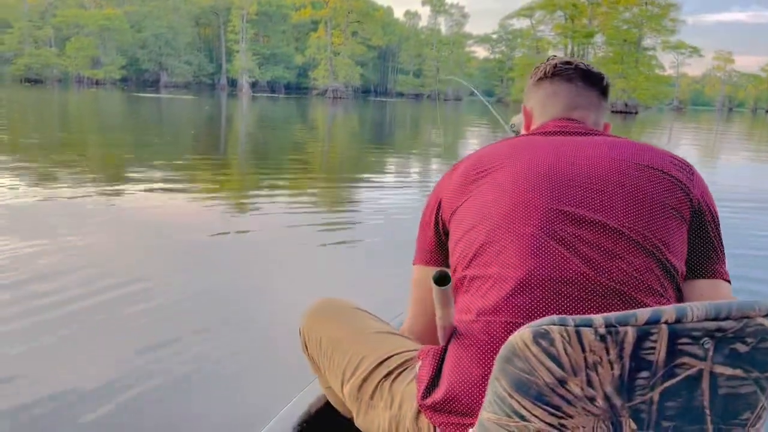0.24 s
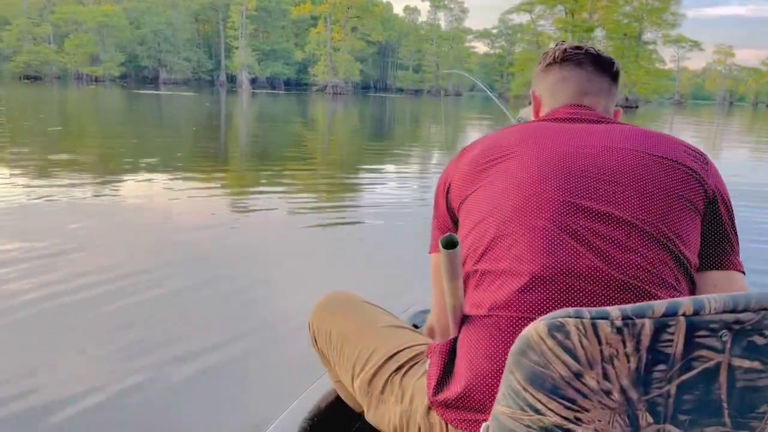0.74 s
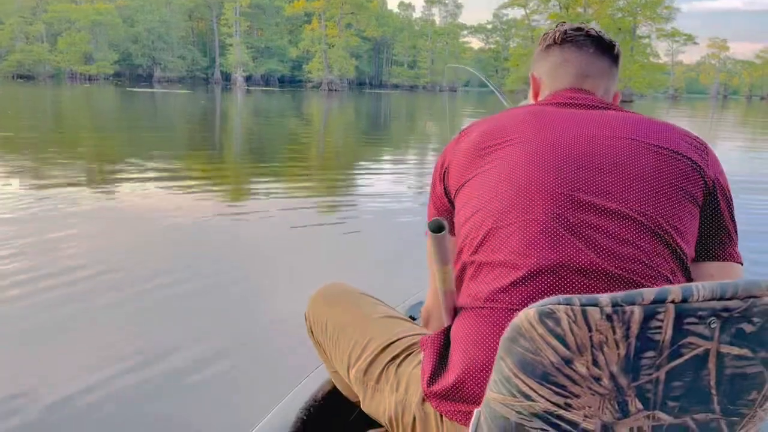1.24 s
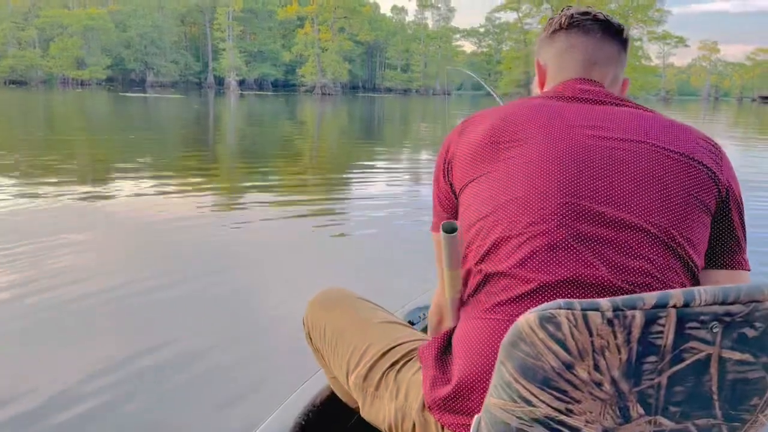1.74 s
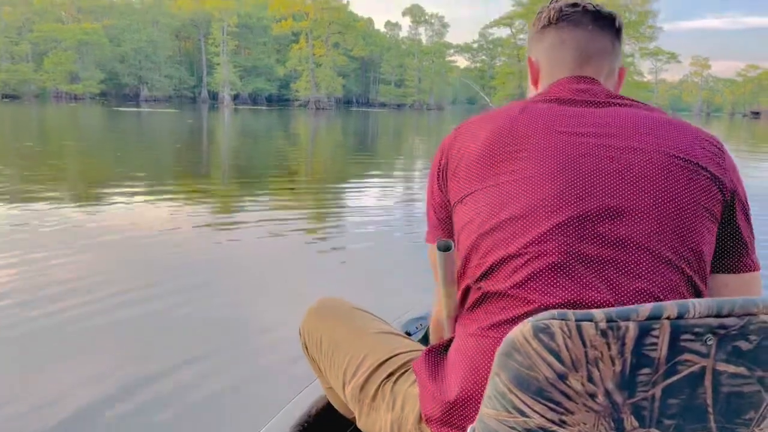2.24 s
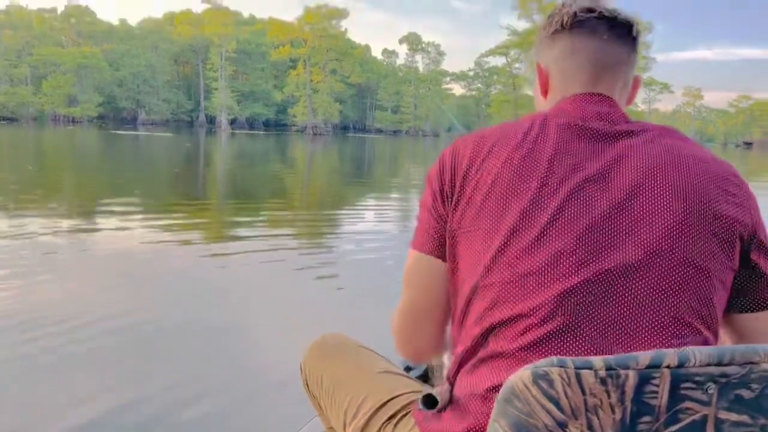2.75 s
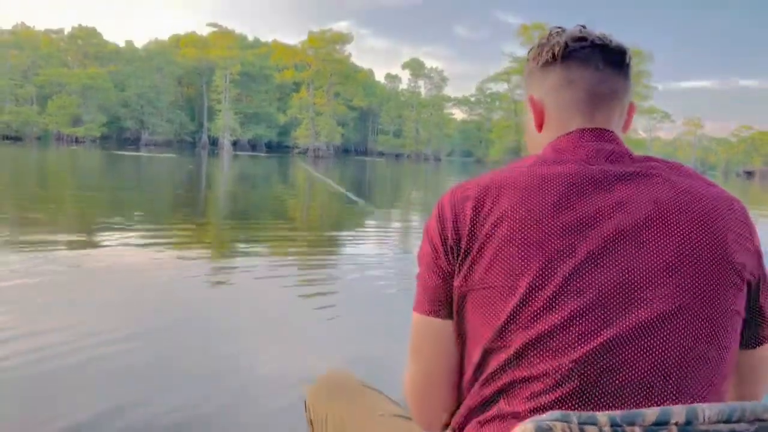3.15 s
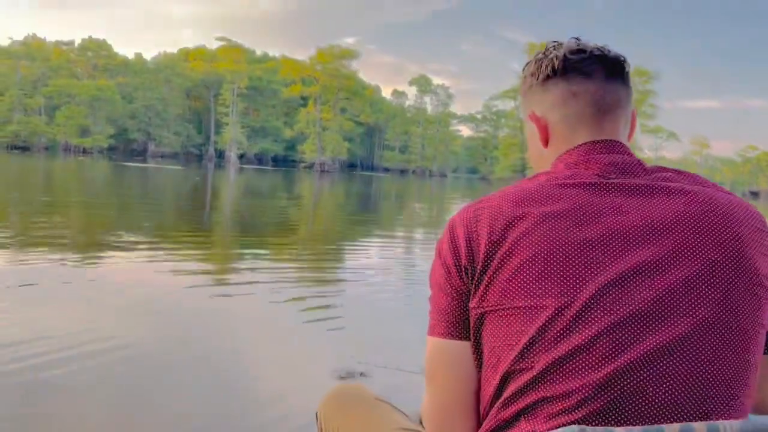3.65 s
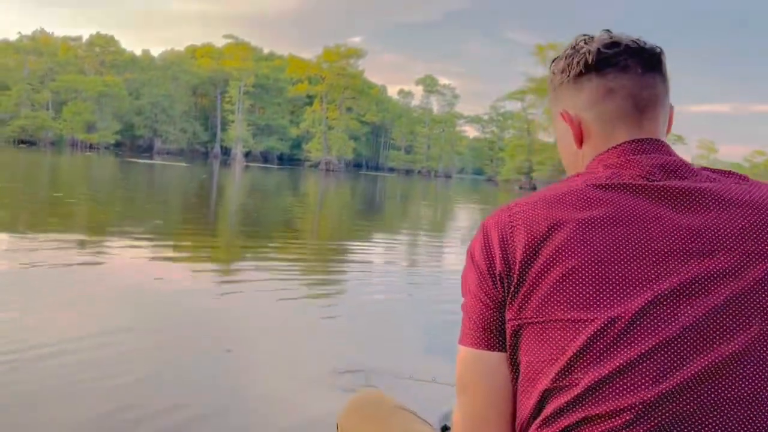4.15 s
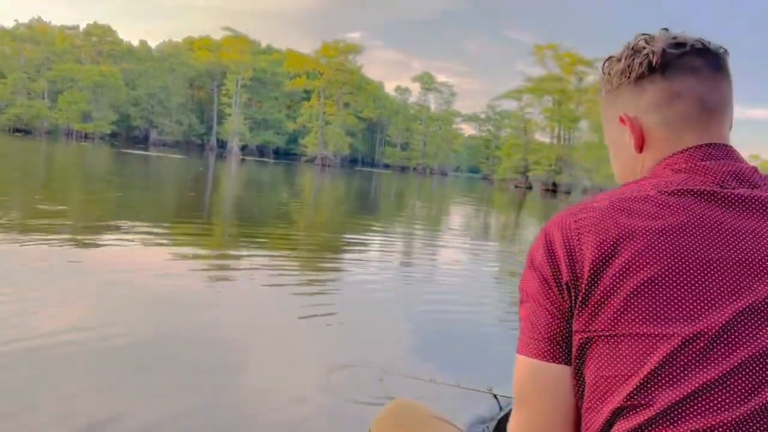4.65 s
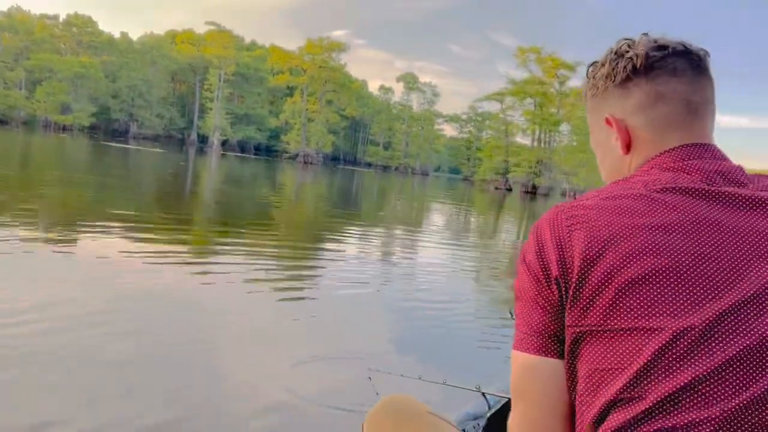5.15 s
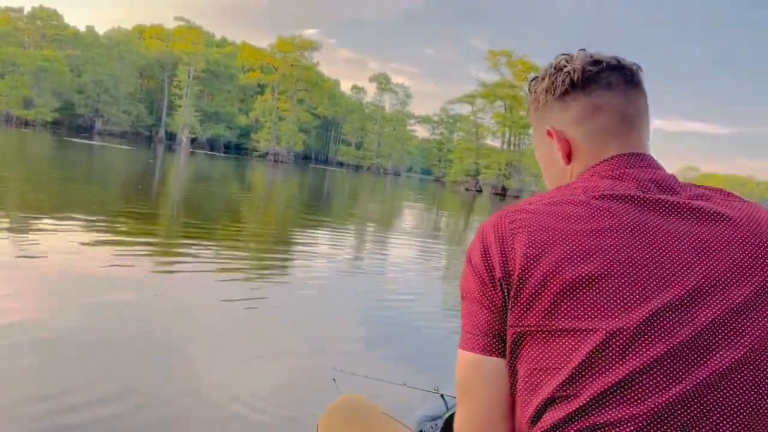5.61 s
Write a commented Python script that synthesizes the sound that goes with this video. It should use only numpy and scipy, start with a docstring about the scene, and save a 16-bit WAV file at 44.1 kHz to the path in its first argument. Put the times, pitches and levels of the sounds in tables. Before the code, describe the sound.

Electric motor hum on a calm lake, soft deck bumps and tackle clicks, a thin bird calling, then gear clattering sharply on a small boat's hull.

```python
"""On a calm lake an electric motor hums throughout as wavering sines, over broad background noise.
A small boat's deck bumps softly, an angler's tackle clicks in bursts of decaying modes, and the deck
bumps again. Small birds call thinly from the wooded shore in gliding, fluttering sines, and cast line
hisses. As the line stops, gear drops on the hull and bounces in a rattle of ringing hull modes.
Late on, a foot scuffs the deck in gritty noise, lighter knocks follow and a bird calls again."""
import sys
import numpy as np
from scipy import signal
from scipy.fft import rfft, irfft, next_fast_len
from scipy.io import wavfile
from scipy.ndimage import uniform_filter1d, map_coordinates

SR = 44100
rng = np.random.default_rng(int(sys.argv[2]) if len(sys.argv) > 2 else 0)


def wav_out(sig):
    """Save sig, one row per channel (or a flat mono array), as 16-bit PCM at SR to the path in sys.argv[1]."""
    wavfile.write(sys.argv[1], SR, np.round(np.clip(np.atleast_2d(sig).T, -1, 1) * 32767).astype(np.int16))


N = 259308

# colour of the broad background noise: freq_hz, density_db (per Hz)
BACKGROUND_COLOUR = [(20, -20.5), (55, 5), (100, 5.5), (150, 0), (260, -1), (450, -11.5), (760, -21.5),
                     (1020, -12), (1300, -29), (2100, -28), (2750, -22), (3500, -35), (4100, -30),
                     (4800, -40.5), (5600, -31.5), (7200, -41.5), (8800, -59.5), (9900, -46), (11400, -55),
                     (13000, -92.5)]
# width of every broad noise: freq_hz, side_over_mid_db
NOISE_WIDTH = [(60, -26.5), (120, -21.5), (360, -8.5), (660, -1), (1200, -7.5), (2200, -8.5), (4000, 0),
               (7300, -8), (13000, 16)]
# drifting main tone of the motor: time_s, pitch_hz, level_db
MOTOR_TONE = [(0, 107.8, -51), (1.3, 105.4, -52), (2.8, 115.5, -54.5), (5.7, 117.1, -57)]
# steady-pitched lines of the motor: pitch_hz, start_level_db, level_slope_db_per_s
MOTOR_LINES = [(185.2, -55.5, -0.9), (278, -63, 1), (372, -68, 0)]
# decay of the tail from the trees: freq_hz, t60_s
SHORE_DECAY = [(200, 0.33), (2000, 0.14), (6000, 0.72), (12000, 0.36)]
# nearly flat colour of that tail: freq_hz, density_db
SHORE_COLOUR = [(100, 0.0014), (12000, 0.023)]
# quick echoes off water and trunks: freq_hz, density_db; then freq_hz, t60_s
ECHO_COLOUR = [(1000, 0), (12000, 0)]
ECHO_DECAY = [(1000, .12), (12000, .12)]
# a small bird's short peaked chips: start_s, length_s, top_hz, level_db
BIRD_CHIPS = [(1.915, .016, 5100, -69), (1.94, 0.018, 5190, -62), (2.319, 0.028, 5320, -59),
              (2.424, 0.03, 5140, -62), (2.543, 0.039, 5270, -60), (2.684, 0.037, 5440, -59),
              (4.913, 0.018, 5220, -65), (5.06, .022, 5060, -72), (5.096, 0.02, 5280, -66),
              (5.153, .025, 5510, -68), (5.236, 0.0313, 5330, -59.5), (5.396, 0.026, 5280, -60.5),
              (5.522, 0.025, 5330, -60), (5.627, 0.014, 5180, -65), (5.656, 0.018, 5190, -64.5)]
# its buzzy slurs: start_s, length_s, from_hz, to_hz, level_db
BIRD_BUZZES = [(2.016, 0.057, 5040, 5750, -64.5), (2.096, 0.097, 6070, 4720, -58.5),
               (2.751, 0.053, 4964, 5070, -65), (2.83, .04, 5035, 5310, -62.5),
               (2.851, 0.13, 5634, 5900, -54), (5.73, 0.064, 4960, 5080, -67.5),
               (5.829, 0.053, 5550, 5820, -53.5)]
# its clear whistles: start_s, length_s, from_hz, to_hz, upward_bow_hz, level_db
BIRD_WHISTLES = [(2.049, .018, 5800, 5700, 403, -59), (2.892, .11, 5950, 5390, 254, -44),
                 (2.99, 0.025, 5750, 4750, 149, -59), (3.163, 0.029, 6730, 4880, 122.5, -50),
                 (3.192, 0.041, 4700, 4950, -400, -60), (3.234, .035, 4800, 4700, 56, -63.5),
                 (3.306, 0.064, 5450, 5510, 271, -40.5), (5.773, 0.02, 5400, 5590, 647.5, -55.5)]
# a second bird's low falling peeps: start_s, from_hz, level_db
BIRD_PEEPS = [(2.18, 2350, -69), (2.344, 2440, -60), (2.36, 3200, -70), (2.419, 3400, -69),
              (2.482, 2470, -55.5), (2.53, 3550, -66), (2.56, 2550, -67)]
# the deck flexing under shifting weight: peak_s, pitch_hz, level_db
DECK_BUMPS = [(.06, 150, -44), (.11, 115, -45.5), (1.5, 170, -36), (1.546, 138, -41), (1.583, 98, -38),
              (1.685, 126, -29.5), (1.718, 95, -32.5), (1.75, 74.5, -32), (1.793, 250, -40),
              (4.668, 159, -45), (4.744, 269, -44), (4.767, 265, -41.5), (4.798, 202, -45.5)]
# colour of a sole rubbing the deck: freq_hz, density_db
SCUFF_COLOUR = [(90, -10.0), (170, -21.0), (250, 4.5), (330, 1), (420, -3.5), (600, -1.0),
                (1000, -16.5), (1600, -15.5), (4000, -70.0)]
# ring of each grit slip: freq_hz, density_db; then freq_hz, t60_s
GRIT_COLOUR = [(300, -20), (600, 0), (1500, -4), (3000, -12), (6000, -26)]
GRIT_DECAY = [(500, .05), (4000, .02)]
# colour of line leaving the spool: freq_hz, density_db
LINE_COLOUR = [(1500, -25), (2300, -3), (2900, 0), (3400, -3), (4000, -16), (4900, -24),
               (6200, -13), (11000, -27), (13000, -60)]
# hand shifting its grip, a grainy rustle of the reel: middle_s, half_length_s, level_db
GRIP_RUSTLES = [(0.527, 0.063, -67.5), (1.13, 0.028, -74.5), (1.607, 0.022, -50.5), (1.667, 0.006, -50),
                (1.695, 0.0093, -42.5), (2.14, 0.044, -72.5), (2.387, 0.047, -70), (3.373, 0.024, -72),
                (3.463, 0.016, -52.5), (4.635, .015, -67)]
# ring of a loose reel part: freq_hz, density_db; then freq_hz, t60_s
CHATTER_COLOUR = [(900, -14.5), (2000, -1), (3000, -1), (4200, 0.5), (4900, -7), (5900, 6), (7000, 4.5),
                  (7900, -1.5), (9000, -13.5), (10000, 8.5), (11400, 0.5), (12400, -15), (14500, -24)]
CHATTER_DECAY = [(1000, .05), (6000, .03), (11000, .025)]
# metal parts of the reel snapping: start_s, tick_db, brightness_db, ring_hz, ring_db
REEL_SNAPS = [(0.446, -57, 13, 3040, -53), (0.478, -59, 13, 3100, -46), (0.514, -59.5, 3, 6330, -50),
              (0.533, -56.5, -3, 845, -43), (0.621, -58, 9, 6880, -47.5), (0.654, -68, 5, 6860, -59),
              (0.705, -61.5, 12, 3300, -55), (1.541, -62.5, 14, 6880, -52),
              (1.5696, -49.5, 13, 11000, -36.5), (1.648, -48, 9, 6300, -44),
              (1.6839, -44, 2.5, 3350, -37.5), (1.694, -61, 21, 5930, -42), (1.721, -54.5, 6, 5860, -43),
              (1.7845, -46.5, 2, 2540, -39), (1.805, -57.5, 0, 5750, -51), (2.308, -52.5, 3.5, 2900, -41.5),
              (2.673, -63, 5, 2940, -55), (2.927, -49, 3, 6060, -56), (3.293, -51, 3.5, 2250, -44),
              (3.356, -34, 3, 3810, -27), (3.723, -42, -0.5, 2870, -35), (3.741, -74.5, 3, 4060, -63),
              (4.209, -63, -3.5, 6340, -60)]
# duller taps of the rod and its handle: start_s, clack_db, brightness_db, ring_hz, ring_db
ROD_TAPS = [(1.481, -51, -19, 1180, -47), (1.535, -59, -12, 1250, -50), (1.654, -29, -11, 1755, -16),
            (1.986, -64.5, -4, 3260, -57), (2.23, -61, -3.5, 1910, -71), (2.331, -55, -4, 2900, -51),
            (2.454, -57, -27, 1640, -53), (2.958, -48, 5, 1860, -36), (3.234, -69, 8, 2900, -64),
            (3.255, -63.5, 4, 2590, -53), (3.34, -53, 3, 2700, -41), (3.379, -46.5, -5, 2715, -52),
            (3.4185, -36, -2, 2134, -9.5), (3.93, -54.5, -6.5, 2920, -53), (4.362, -71, 3, 3620, -69),
            (4.022, -56.5, -12, 1390, -53), (4.611, -47.5, -1, 3940, -36.5), (4.647, -49, -10.5, 2540, -42),
            (4.63, -59, -6, 2100, -55), (4.869, -53.5, -6, 2990, -44.5), (4.885, -53.5, -10, 620, -43),
            (5.17, -57, 5.5, 3960, -59), (5.214, -62.5, -9, 1300, -46.5)]
# strong modes of the tackle, before random detuning and scatter: pitch_hz, level_db, t60_s
TACKLE_MODES = [(590, -15, .07), (840, -10, .08), (1130, -7, .06), (1430, -1, .05), (1860, 0, .043),
                (2370, -9, .04), (3200, -6, .035), (3820, -5, .03), (5900, -7, .035), (6900, -6, .03)]
# dense tackle modes between those: freq_hz, density_db; then freq_hz, t60_s
TACKLE_WASH_COLOUR = [(150, -19), (500, 2.5), (1500, 0), (3200, 1), (4200, 1), (4900, -2.5), (6200, 1),
                      (7800, -5.5), (9000, -36.5), (10800, -28.5), (12200, -40), (14500, -35.5)]
TACKLE_WASH_DECAY = [(500, 0.13), (2000, 0.13), (6000, 0.051), (11000, 0.05)]
# gear landing on the hull: start_s, knock_db, thud_db, crack_db
HULL_KNOCKS = [(1.4797, -58, -41, -65), (1.532, -64, -47.5, -71), (3.417, -22, -22.5, -26),
               (3.474, -31, -32.5, -35), (3.6152, -28.5, -30.5, -34), (3.6486, -29.5, -34.5, -37),
               (3.669, -42, -36, -40.5), (3.701, -47, -45, -74), (3.774, -35, -38, -40.5),
               (3.801, -43, -40.5, -58), (3.825, -47, -45.5, -59), (3.8613, -42, -44, -54),
               (3.888, -49.5, -44.5, -70.5), (3.936, -52, -55.5, -78), (4.019, -59, -54, -73),
               (4.645, -50, -48, -62), (4.676, -57.5, -48.5, -67), (4.884, -54, -48.5, -70),
               (4.903, -60, -56, -80)]
# strong hull modes, before the force of a contact tilts and damps them: pitch_hz, level_db, t60_s
HULL_MODES = [(102, -6, .3), (136, -5, .28), (170, -11, .16), (210, -4, .22), (242.5, -.5, .28),
              (285, -11, .18), (317, -.5, .2), (372, -9, .15), (486, -3, .14), (522, -7, .12),
              (559, -4, .11), (592, -6, .09), (636, -4, .1), (755, -7, .08), (788, -10, .08),
              (912, -14, .09), (1175, -9, .06), (1215, -4, .08), (1455, 2, .1), (1551, 3.5, .1),
              (1595, 1, .09), (1850, -8, .05), (2035, -6, .05), (2140, -5, .05), (2365, -9, .06),
              (2680, -11, .05), (2880, -3, .04), (3030, -5, .04), (3160, -8, .04), (3600, -9, .04),
              (4230, -6, .035)]
# dense hull modes between those: freq_hz, density_db; then freq_hz, t60_s
HULL_WASH_COLOUR = [(50, -9), (110, -13), (160, -18), (230, -11), (350, -7.5), (560, -10), (780, -14),
                    (1020, -26), (1200, -15.5), (1320, -26.5), (1550, -16), (1750, -19.5), (2100, -17.5),
                    (2600, -22), (2900, -17), (3350, -23.5), (4200, -20.5), (4900, -33), (6000, -21.5),
                    (7800, -23), (9000, -39), (10900, -19.5), (13500, -31)]
HULL_WASH_DECAY = [(100, 0.24), (300, 0.23), (700, 0.1043), (1800, 0.055), (5000, 0.045), (11000, 0.028)]
# width of the close sounds: freq_hz, side_over_mid_db
BOAT_WIDTH = [(110, -32), (200, -18), (400, -9), (520, -8.5), (700, 2), (850, -9.5), (1300, -4.5),
              (1500, -14), (1700, -10.5), (2100, -13), (2600, 1), (2900, -4.5), (3300, 1.5), (3900, -10),
              (4800, 8), (5800, -12.5), (7200, -5), (9000, 23), (11000, -4), (12500, -13.5)]
# phase lead of side over mid in the close sounds: freq_hz, phase_rad
BOAT_PHASE = [(200, 4.3), (620, 4.2), (1150, 2.8), (2000, 2.2), (3000, 1.7), (4400, 1.5), (5400, 4.5),
              (6800, 1.8), (8600, 1.5), (9600, 4.5)]

# registers of a hull knock, then of a tackle click: low_hz, high_hz
THUD, BODY, RING, CRACK = (70, 380), (380, 1020), (1020, 2600), (2600, 15000)
CLACK, TICK, SHEEN = (400, 2400), (2700, 8300), (9700, 13000)


def amp(db):
    """Decibels to gain."""
    return 10 ** (np.asarray(db) / 20)


def unit(x):
    """x at rms 1."""
    return x / np.sqrt(np.mean(x ** 2) + 1e-20)


def along(points, hz):
    """Read (Hz, value) points on a log frequency axis."""
    f, v = np.transpose(points)
    return np.interp(np.log(hz + 1), np.log(f + 1), v)


def curves(rows):
    """One value per sample for each column after the time."""
    s, *cols = np.transpose(rows)
    return [np.interp(np.arange(N) / SR, s, c) for c in cols]


def wobble(rate):
    """A smooth random curve, rate knots a second."""
    knots = rng.standard_normal(int(N * rate / SR) + 4)
    return map_coordinates(knots, [np.arange(N) * rate / SR])


def swell(s, rise, fall):
    """A gain that rises to 1 at time s and falls again, both in dB a second."""
    t = np.arange(N) / SR - s
    return amp(np.minimum(abs(rise) * t, -abs(fall) * t))


def filtered(x, response):
    """x shaped by a complex response of frequency."""
    n = x.shape[-1]
    m = next_fast_len(n + 4096)
    return irfft(rfft(x, m) * response(np.fft.rfftfreq(m, 1 / SR)), m)[..., :n]


def add(track, s, sound):
    """Mix a sound into the track at time s."""
    part = track[..., round(s * SR):][..., :sound.shape[-1]]
    part += sound[..., :part.shape[-1]]


def dying_noise(colour, decay, size):
    """Two coloured noises whose every frequency dies at its own speed."""
    noise = filtered(rng.standard_normal((2, size)), lambda hz: amp(along(colour, hz)))
    hz, t, z = signal.stft(noise, SR, nperseg=128)
    fading = z * amp(-60 * t / along(decay, hz)[:, None])
    return signal.istft(fading, SR, nperseg=128)[1][:, :size]


def rush(colour, patchy_db):
    """Wide noise, as mid and side, with patches of random gain in time and frequency."""
    z = signal.stft(rng.standard_normal((2, N)), nperseg=512)[2]
    field = uniform_filter1d(rng.standard_normal(z.shape[1:]), size=6, axis=0)
    field = uniform_filter1d(field, size=14, axis=1)
    pair = signal.istft(z * amp(patchy_db * unit(field)), nperseg=512)[1][:, :N]
    mid, side = filtered(pair, lambda hz: amp(along(colour, hz)))
    side = filtered(side, lambda hz: amp(along(NOISE_WIDTH, hz)))
    return np.array([mid, side]) / mid.std()


def background_noise():
    """Broad background noise: low rumble, and a faint treble hiss of random, wavering level."""
    noise = rush(BACKGROUND_COLOUR, patchy_db=1.5)
    rumble = filtered(noise, lambda hz: 1 / (1 + (hz / 400) ** 4))
    hiss = filtered(noise, lambda hz: 1 - 1 / (1 + (hz / 7500) ** 8))
    middle = noise - rumble - hiss
    return amp(-54) * (amp(0.94 * wobble(3)) * rumble + middle + amp(3.5 * wobble(10)) * hiss)


def motor():
    """An electric motor hums: one drifting tone and a few steady, slightly wavering lines."""
    t = np.arange(N) / SR
    hz, db = curves(MOTOR_TONE)
    level = amp(db + 1.27 * wobble(9))
    hum = level * np.sin(2 * np.pi * np.cumsum(hz + 2 * wobble(2.9)) / SR)
    for line_hz, line_db, db_per_s in MOTOR_LINES:
        phase = 2 * np.pi * line_hz * t + .4 * wobble(7)
        hum = hum + amp(line_db + db_per_s * t + 1.3 * wobble(3.5)) * np.sin(phase)
    return np.array([hum, np.zeros(N)])  # mid only


def shore(x):
    """The trees scatter back a faint diffuse tail: the mid convolved with decaying noise."""
    tail = dying_noise(SHORE_COLOUR, SHORE_DECAY, size=SR)
    return signal.fftconvolve(x[:1], tail / np.linalg.norm(tail[0]), axes=1)[:, :N]


def over_water(song):
    """Water and nearby trunks add quick weak echoes that blur each bird note."""
    echoes = dying_noise(ECHO_COLOUR, ECHO_DECAY, size=SR // 8)
    blur = signal.fftconvolve(song[:1], echoes / np.linalg.norm(echoes[0]), axes=1)[:, :N]
    return song + amp(-13) * blur


def note(length, from_hz, to_hz, bow_hz, buzz, pointed=1):
    """A thin bowed glide, a little unsteady; fast flutter of pitch and level makes it buzz."""
    t = np.arange(int(length * SR)) / SR
    u = t / length
    drift = map_coordinates(rng.standard_normal(64), [130 * t])  # 130 knots a second
    flutter = buzz * np.sin(2 * np.pi * 184 * t + 0.22 * drift)  # 184 Hz
    glide = from_hz + (to_hz - from_hz) * u + bow_hz * (4 * u * (1 - u)) ** pointed
    phase = 2 * np.pi * np.cumsum(glide * (1 + .009 * drift) + 300 * flutter) / SR
    level = amp(5.7 * flutter + 2.2 * drift) * np.sin(np.pi * u) ** .7
    return level * np.array([np.sin(phase), 0.19 * np.cos(phase)])


def bird():
    """One bird chips, buzzes and whistles in gliding sines; two others call lower and fainter."""
    chip_foot_hz = 5140  # where a chip starts and ends
    peep_s, peep_fall_hz = 0.051, 149
    out = np.zeros((2, N))
    for s, length, top_hz, db in BIRD_CHIPS:
        rise_hz = top_hz - chip_foot_hz
        chip = note(length, chip_foot_hz, chip_foot_hz, rise_hz, buzz=0.22, pointed=1.9)
        add(out, s, amp(db) * chip)
    for s, length, from_hz, to_hz, db in BIRD_BUZZES:
        add(out, s, amp(db) * note(length, from_hz, to_hz, bow_hz=168, buzz=0.97))
    for s, length, from_hz, to_hz, bow_hz, db in BIRD_WHISTLES:
        add(out, s, amp(db) * note(length, from_hz, to_hz, bow_hz, buzz=.1))
    for s, hz, db in BIRD_PEEPS:
        add(out, s, amp(db) * note(peep_s, hz, hz - peep_fall_hz, bow_hz=0, buzz=0.35))
    far_call = note(0.17, 1790, 1790, bow_hz=0, buzz=0)  # one level note from far away
    add(out, 5.762, amp(-69) * far_call)
    return out


def bump(hz):
    """One soft flex of the deck: a swell of a few cycles and its octave."""
    cycles = hz * (np.arange(SR // 5) / SR - .1)  # counted from the peak, 0.1 s in
    phase = 2 * np.pi * (cycles + rng.random((2, 1)))
    envelope = np.exp(-(cycles / 0.96) ** 2 / 2)
    return envelope * (np.sin(phase[0]) + amp(-9.5) * np.sin(2 * phase[1]))


def deck():
    """Shifting weight flexes the deck in soft bumps, and a foot scuffs across it as gritty noise."""
    rub = amp(-54 + 3 * wobble(45))  # the sole sticks and slips
    rub = rub * swell(4.66, rise=48.5, fall=32)
    out = rub * rush(SCUFF_COLOUR, patchy_db=3.0)
    grit_per_s = 120
    slips = (rng.random(N) < grit_per_s / SR) * rng.standard_normal(N)
    ring = dying_noise(GRIT_COLOUR, GRIT_DECAY, size=SR // 10)
    crackle = unit(signal.fftconvolve(slips[None], ring, axes=1)[:, :N])  # grit under the sole
    out = out + amp(-12) * rub * crackle * [[1], [.5]]
    for s, hz, db in DECK_BUMPS:
        add(out[0], s - .1, amp(db) * bump(hz))
    return out


def line():
    """Line hisses off the spool during the cast, fluttering as the coils leave."""
    full_speed_s, stop_s, release_s = 2.58, 3.42, 0.14
    hiss = rush(LINE_COLOUR, patchy_db=2)
    flutter = amp(1.8 * wobble(70))
    running = np.clip((stop_s - np.arange(N) / SR) / release_s, 0, 1)
    return amp(-69) * swell(full_speed_s, rise=60, fall=0) * running * flutter * hiss


def strike(modes, wash, decay, wash_db, attack, scatter_db, detune):
    """One blow, heard two ways: the strong modes at new strengths over a wash of dense ones."""
    t = np.arange(SR // 3) / SR
    hz, db, t60 = np.transpose(modes)[:, :, None]
    hz = hz * (1 + detune * rng.standard_normal(hz.shape))
    size = amp(db + scatter_db * rng.standard_normal(hz.shape) - 60 * t / t60)
    size = size * (1 - np.exp(-t * hz / 0.098))  # builds up over about a tenth of a cycle
    phase = 2 * np.pi * (hz * t + rng.random((2, len(hz), 1)))
    ring = (size * np.sin(phase)).sum(1)
    dense = amp(wash_db) * unit(dying_noise(wash, decay, len(t)))
    return (unit(ring) + dense) * (1 - np.exp(-(t / attack) ** 2))


def register(blow, edges):
    """One register of a blow (edges in Hz), its mid at rms 1 over its loudest 10 ms."""
    part = signal.sosfilt(signal.butter(4, edges, "band", fs=SR, output="sos"), blow)
    return part / np.sqrt(uniform_filter1d(part[0] ** 2, size=SR // 100).max())


def reel():
    """Loose reel parts tick unevenly: faintly all along, more near snaps, knocks and grip shifts."""
    ticks_per_s, spread = 800, .7
    jolts = [(s, db - 17) for s, db, *_ in REEL_SNAPS]
    jolts += [(s, db - 38) for s, db, *_ in HULL_KNOCKS]
    shaking = np.max([amp(db) * swell(s, rise=316.5, fall=183.5) for s, db in jolts], axis=0)
    shaking = np.minimum(shaking, amp(-57.0))  # the parts have only so much play
    t = np.arange(N) / SR
    for s, half, db in GRIP_RUSTLES:
        shaking = shaking + amp(db) * np.exp(-((t - s) / half) ** 2)
    chatter = np.zeros((2, N))
    for part in range(4):  # each loose part has its own ring
        ticks = (rng.random(N) < ticks_per_s / 4 / SR) * np.exp(spread * rng.uniform(-1.1, 2, N))
        ring = dying_noise(CHATTER_COLOUR, CHATTER_DECAY, size=SR // 10)
        chatter = chatter + signal.fftconvolve(ticks[None], ring, axes=1)[:, :N]
    idle = amp(-80 + 2.3 * wobble(7))
    return (shaking + idle) * unit(chatter)


def click(clack_db, tick_db, sheen_db):
    """One contact in the tackle, in three registers: clack, tick and sheen."""
    blow = strike(TACKLE_MODES, TACKLE_WASH_COLOUR, TACKLE_WASH_DECAY,
                  wash_db=-2, attack=.0009, scatter_db=3, detune=.035)
    out = amp(clack_db) * register(blow, CLACK)
    out = out + amp(tick_db) * register(blow, TICK)
    return out + amp(sheen_db) * register(blow, SHEEN)


def ping(hz, t60):
    """The struck part rings briefly at its own pitch, as a decaying sine."""
    t = np.arange(SR // 10) / SR
    envelope = amp(-60 * t / t60) * (1 - np.exp(-t * hz))
    return envelope * np.sin(2 * np.pi * (hz * t + rng.random((2, 1))))


def tackle():
    """The reel's metal parts snap brightly; the rod taps with a duller clack; each contact rings."""
    out = np.zeros((2, N))
    for s, db, bright_db, hz, ring_db in REEL_SNAPS:
        sheen_db = db - 1.5 + 0.52 * bright_db  # a brighter snap has more top treble
        add(out, s, click(db - bright_db, db, sheen_db))
        add(out, s + .001, amp(ring_db) * ping(hz, t60=0.052))
    for s, db, bright_db, hz, ring_db in ROD_TAPS:
        add(out, s, click(db, db + bright_db, db + bright_db - 17.5))
        add(out, s + .001, amp(ring_db) * ping(hz, t60=0.028))
    return out


def knock(knock_db, thud_db, crack_db):
    """One hull contact: the harder, the brighter and shorter; slow bending waves delay the thud."""
    over_hard_db = knock_db + 25.5  # a hard knock is -25.5 dB
    force = min(amp(over_hard_db), 1)
    tilt = np.clip(0.41 * over_hard_db, -4, 5)  # dB per octave above 1500 Hz
    modes = []
    for hz, db, t60 in HULL_MODES:
        damping = 1 + .75 * np.sqrt(force) * (hz > BODY[0])  # contact shortens the upper modes
        modes.append((hz, db + tilt * np.log2(max(hz, 1500) / 1500), t60 / damping))
    blow = strike(modes, HULL_WASH_COLOUR, HULL_WASH_DECAY,
                  wash_db=-5.5, attack=.003, scatter_db=2.3, detune=.002)
    out = amp((knock_db + thud_db) / 2) * register(blow, BODY)
    out = out + amp(knock_db) * register(blow, RING)
    out = out + amp(crack_db) * register(blow, CRACK)
    t = np.arange(out.shape[1]) / SR
    punch_db = 4.5 * np.sqrt(force) * np.exp(-((t - 0.0027) / 0.0024) ** 2)  # direct push at the start
    out = out * amp(punch_db)
    add(out, .004, amp(thud_db) * register(blow, THUD))
    return out


def hull():
    """Gear rattles on the hull; in a firm blow its other end slaps down just after, and it jiggles."""
    out = np.zeros((2, N))
    for s, knock_db, thud_db, crack_db in HULL_KNOCKS:
        add(out, s - .001, knock(knock_db, thud_db, crack_db))
        if knock_db > -36:  # a firm blow
            softer = (min(knock_db, -28), thud_db - 7.5, crack_db - 8.5)
            add(out, s + .0095, amp(-13) * knock(*softer))  # the other end
            for delay in rng.uniform(.015, .06, size=3):  # small stray contacts, weaker with time
                add(out, s + delay, amp(-15.5 - 130 * delay) * knock(*softer))
    return out


def near(pair, alike):
    """Close sounds reach the two ports shifted in phase and partly unrelated: mid and side."""
    share = np.clip(alike, 0, 1)

    def related(hz):
        return share * np.exp(1j * along(BOAT_PHASE, hz)) * amp(along(BOAT_WIDTH, hz))

    def unrelated(hz):
        return np.sqrt(1 - share ** 2) * amp(along(BOAT_WIDTH, hz))

    side = filtered(pair[0], related) + filtered(pair[1], unrelated)
    return np.array([pair[0], side])


def scene():
    """Everything summed as mid and side, then turned to left and right."""
    background = background_noise() + motor()
    song = over_water(bird())
    gear = near(tackle() + reel(), alike=0.74) + near(hull(), alike=0.79)
    tails = amp(-15.0) * shore(song) + amp(-29.5) * shore(gear)
    mid, side = background + song + deck() + line() + gear + tails
    return np.array([mid + side, mid - side])


def record(dry):
    """The microphone's treble rolls off near 12.7 kHz; the recorder's band ends steeply at 14.2 kHz."""
    return filtered(dry, lambda hz: 1 / (1 + (hz / 12700) ** 14) / (1 + (hz / 14200) ** 60))


dry = scene()
out = record(dry)
wav_out(out)
```